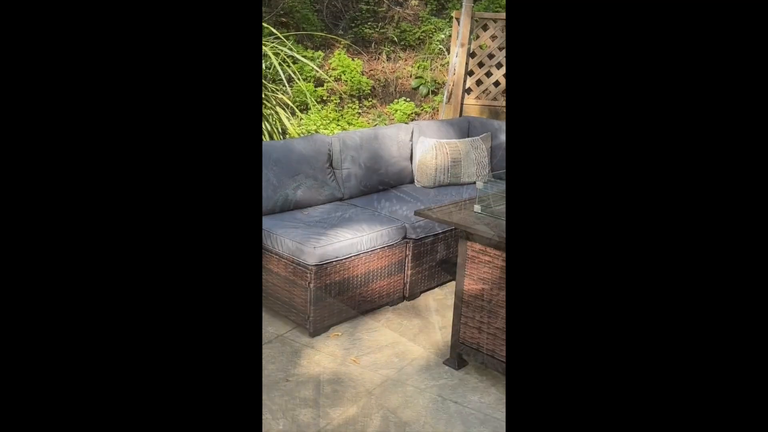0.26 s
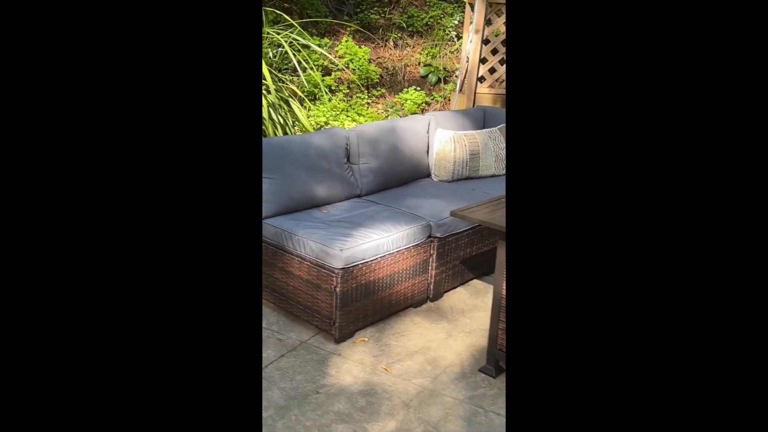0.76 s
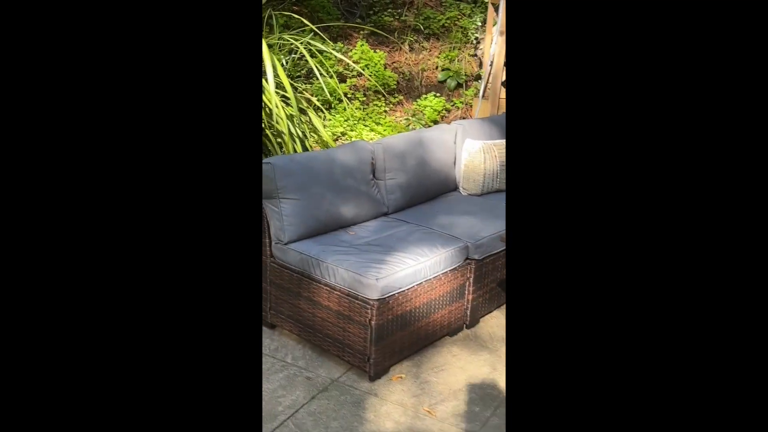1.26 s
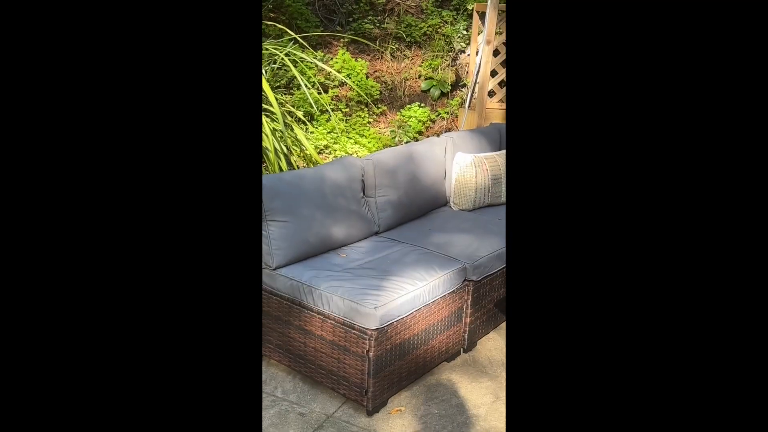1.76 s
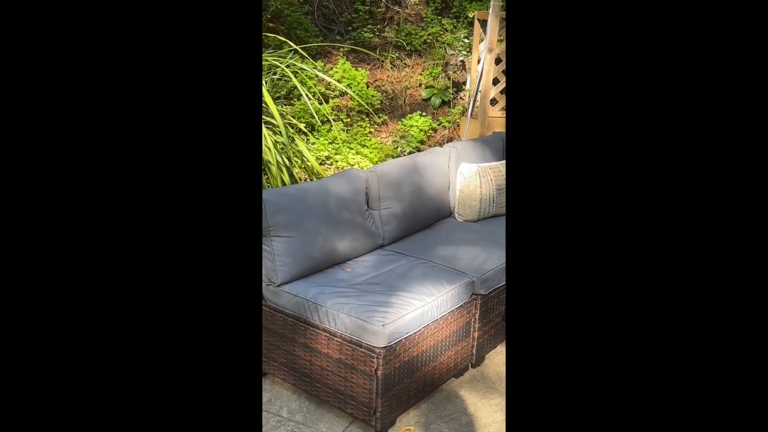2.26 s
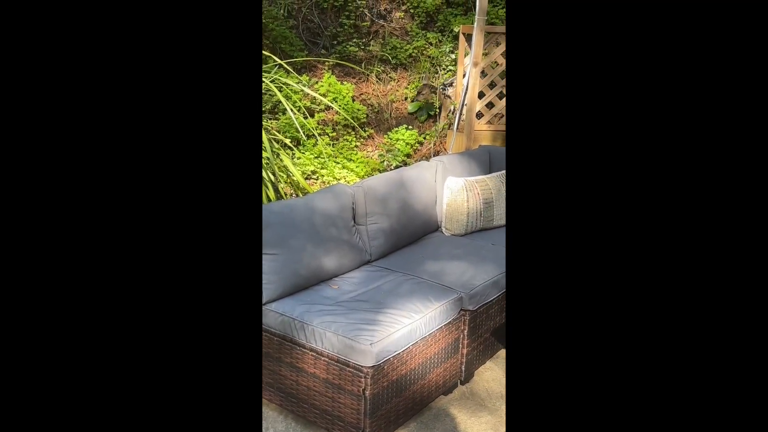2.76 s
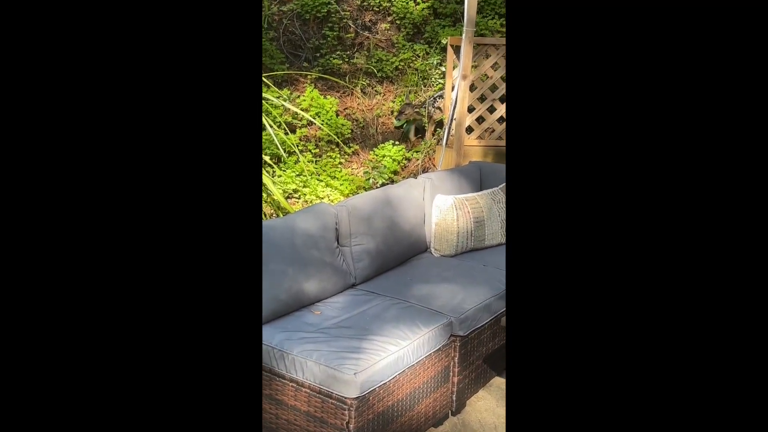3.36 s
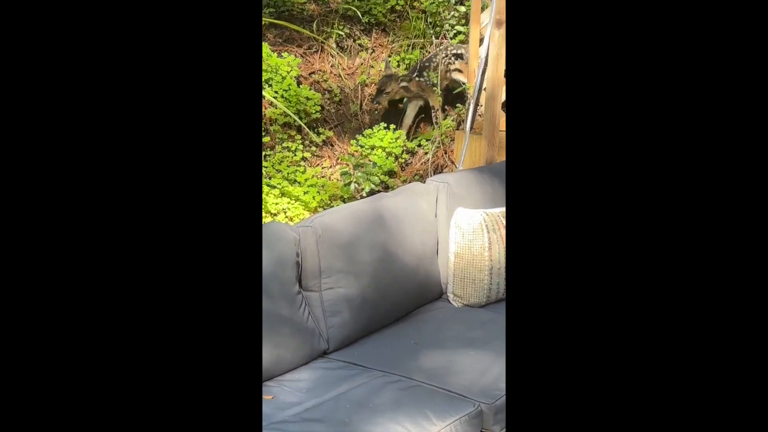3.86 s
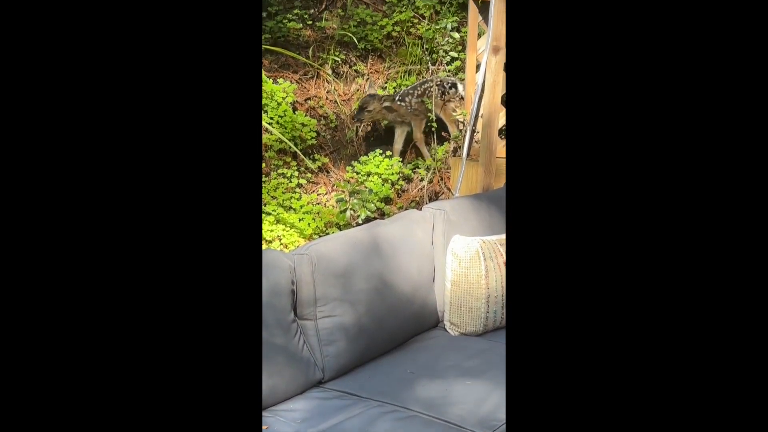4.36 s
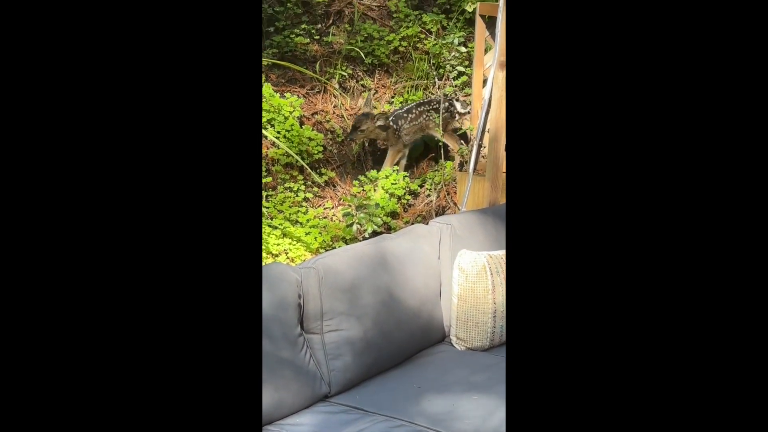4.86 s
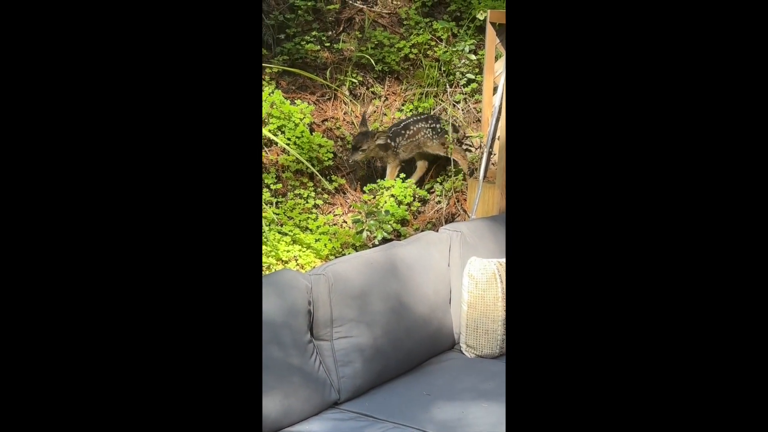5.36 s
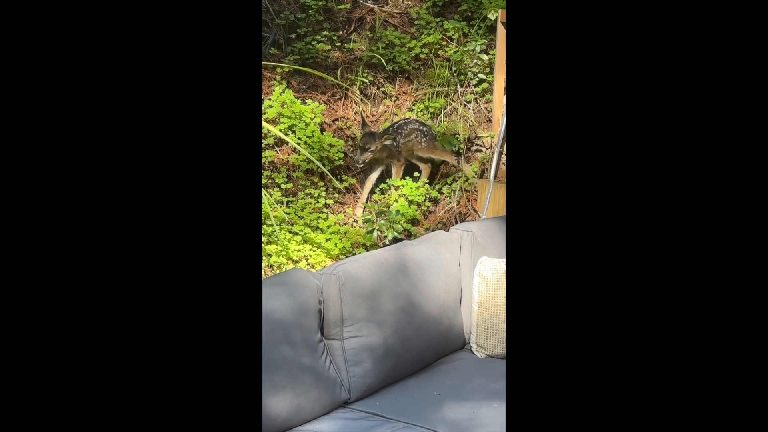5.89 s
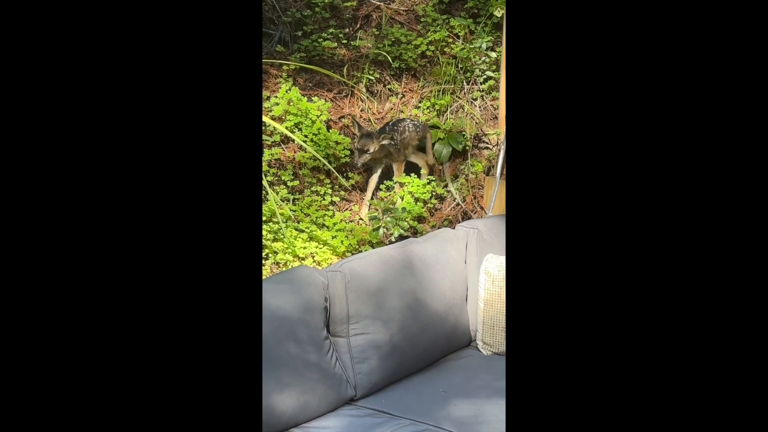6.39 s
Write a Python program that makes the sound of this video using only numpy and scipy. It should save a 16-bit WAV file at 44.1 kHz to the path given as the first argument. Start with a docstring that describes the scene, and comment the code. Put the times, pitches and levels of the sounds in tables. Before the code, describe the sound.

A fawn gives six short, high nasal bleats in a garden, with twig snaps, rustling leaves, soft thuds and a late birdsong phrase.

```python
"""A fawn bleats six times from a garden slope: vocal-fold harmonics shaped by nose, throat and mouth.
Most bleats arch in pitch (the third mainly sinks), turn hoarse as they fall and end in a nasal hum.
A songbird whistles its phrase twice in gliding pure tones, and far birds add thin notes.
Twigs snap as short noise bursts, soft steps thud, and leaves rustle as hiss with tiny ticks.
Under it lies a low outdoor rumble of noise; all is heard on a patio through two microphone ports."""
import sys
import numpy as np
from scipy import signal
from scipy.fft import rfft, irfft, next_fast_len
from scipy.io import wavfile
from scipy.ndimage import uniform_filter1d

SR = 44100
rng = np.random.default_rng(int(sys.argv[2]) if len(sys.argv) > 2 else 0)


def file_out(sig):
    """Save sig as 16-bit WAV at sys.argv[1]."""
    # one column per channel
    cols = np.atleast_2d(sig).T
    # limit, then scale
    lim = np.clip(cols, -1, 1)
    pcm = np.round(lim * 32767).astype(np.int16)
    wavfile.write(sys.argv[1], SR, pcm)


N = 292383  # length in samples
TIME = np.arange(N) / SR  # s


# The fawn's bleats: (start [s], length [s], crest after the start [s],
#   pitch at the start [Hz], at the crest [Hz], at the end [Hz], in the closing hum [Hz],
#   mouth opens after the start [s], opening time [s], closing time [s],
#   soft whine [dB], throat [dB], mouth [dB], bright [dB], hum [dB], final hoarseness [0-1])
BLEAT_CALLS = [(0.0, 0.3797, 0.1834, 872.3, 958.5, 786.2, 792, 0.1002, 0.0534, 0.0041, -75.5, -44, -38.5, -40.5, -46, 0.444),
               (1.219, 0.426, 0.2196, 780.1, 841.6, 629.4, 644.9, 0.096, 0.036, 0.02063, -79, -50.5, -43.5, -43.5, -53.5, 0.99),
               (3.085, 0.2319, 0.049, 635.9, 610.7, 433.6, 348, 0.00054, 0.0315, .024, -60.5, -58.5, -54, -44.5, -80, 0.028),
               (4.184, 0.30386, 0.1159, 800.2, 914.9, 752.9, 803.8, 0.0433, 0.01352, 0.00212, -56.5, -38.5, -35.5, -36.5, -40, 0.304),
               (5.505, .368, .166, 826.1, 920, 737.7, 770.8, 0.0744, 0.0118, 0.0042, -61, -46.5, -36, -38, -41.5, 0.268),
               (6.572, 0.29, 0.132, 836, 945, 735, 770, 0.03996, 0.00826, 0.0035, -60, -44, -38.5, -36, -41.5, .2)]


def fawn():
    """The fawn's voice: each call is sung by its own vocal folds and mouth movement."""
    out = np.zeros(N)
    for row in BLEAT_CALLS:
        add(out, *bleat(row))
    return out


# Shapes of the fawn's four groups of resonances: (frequency [Hz], level [dB])
NOSE_SHAPE = [(350, -32.5), (600, 8.5), (790, 7.5), (950, 1.5), (1300, -52.5), (2500, -68)]
THROAT_SHAPE = [(500, -74.5), (1000, -57), (1300, 2), (1750, 3), (2200, -9.5), (2750, -6.5), (3400, -22.5),
                (6000, -63.5)]
MOUTH_SHAPE = [(1500, -74), (2750, -39.5), (3200, -6.5), (3440, -14.5), (3560, -3.5), (3700, 1),
               (3850, -2.5), (4100, -12), (4650, -15.5), (5400, -41), (9000, -64.5)]
BRIGHT_SHAPE = [(2500, -63), (4200, -28.5), (4900, -20), (5600, -1.5), (6500, -0.5), (7400, -1.5),
                (8400, 4.5), (9400, 8.5), (10200, 7.5), (11200, -0.5), (12500, -15), (16000, -6.5)]
# The voice cracks upward: (middle [s], half length [s], pitch jump [share of the pitch],
#   strong-weak alternation of cycles [0-1], hoarseness [0-1])
VOICE_CRACKS = [(1.345, .051, .112, 0.42, 0.17), (3.141, 0.025, 0.16, 0, 0.06)]
# a soft closed-mouth whine sinks into each bleat that has time before it
LEAD_HZ, LEAD_SINK_HZ_PER_S, WHINE_FADE_S = 899.27, 2250, 0.042
HUM_DELAY_S, HUM_S = 0.012, 0.0074  # the closing hum; a slowly closing mouth delays and lengthens it
RASP_LEAD_S, RASP_S = 0.0234, .022  # the voice turns hoarse just before the hum
# below this pitch, and at the edges of a crack, the folds lose their grip
TAUT_HZ, SLACK_HOARSE, CRACK_HOARSE = 927, 0.74, 0.536


def bleat(row, shimmer=0.03, nose_db=-13, hum_throat_db=-5, sink_power=0.29, throat_sink=0.53,
          upper_power=1.114, linger=4.8):
    """Harmonics of the vocal folds pass through nose, throat and mouth as the mouth opens and shuts."""
    start, length, crest, start_hz, top_hz, end_hz, hum_hz, opens, opening, closing = row[:10]
    whine_db, throat_db, mouth_db, bright_db, hum_db, final_hoarse = row[10:]
    end = start + length
    lead_s = max(LEAD_HZ - start_hz, 0) / LEAD_SINK_HZ_PER_S
    t = np.arange(max(start - lead_s, 0), end + 2 * HUM_DELAY_S + linger * closing, 1 / SR)
    hum_at = end + HUM_DELAY_S + 2 * closing

    pitch = pitch_arch(t - start, length, crest, start_hz, top_hz, end_hz, hum_hz, closing)
    slack = np.maximum(1 - pitch / TAUT_HZ, 0)
    rasp = final_hoarse * bump(t, hum_at - RASP_LEAD_S, RASP_S + 2 * closing)
    hoarse = SLACK_HOARSE * slack + rasp
    doubling = np.zeros(len(t))
    for s, half, jump, alternation, rough in VOICE_CRACKS:
        crack = np.exp(-((t - s) / half) ** 6)
        pitch = pitch * (1 + jump * crack)
        # the sine peaks on the two edges of the crack
        hoarse = hoarse + rough * crack + CRACK_HOARSE * alternation * np.sin(np.pi * crack)
        doubling = doubling + alternation * crack
    pitch = uniform_filter1d(pitch, size=500)  # the larynx moves in rounded arcs

    # alternately strong and weak cycles put lines halfway between the harmonics
    k = np.arange(2, 57)[:, None] / 2
    line_gain = np.where(k % 1 == 0, 1, np.minimum(doubling, 1))
    lines = folds(k, pitch, np.clip(hoarse, 0, 1)) * line_gain

    opened = step(t, start + opens, opening)
    not_shut = 1 - step(t, end, closing)
    whine_fade_in = np.minimum((t - t[0]) / WHINE_FADE_S, 1)
    whine = gain_of(whine_db) * whine_fade_in * (1 - step(t, hum_at, 2 * closing))
    hum = gain_of(hum_db) * bump(t, hum_at, HUM_S + closing)
    open_throat = gain_of(throat_db) * opened * (1 - step(t, end + HUM_DELAY_S, closing))
    throat = whine + open_throat + gain_of(hum_throat_db) * hum
    nose = gain_of(nose_db) * throat + hum
    upper = opened ** upper_power * not_shut

    # throat and bright resonances sink with the larynx, the bright ones most
    sink = (pitch / TAUT_HZ) ** sink_power
    groups = [(NOSE_SHAPE, nose, 1),
              (THROAT_SHAPE, throat, sink ** throat_sink),
              (MOUTH_SHAPE, gain_of(mouth_db) * upper, 1),
              (BRIGHT_SHAPE, gain_of(bright_db) * upper, sink)]
    voice = np.zeros(len(t))
    for shape, gain, shift in groups:
        top_db = max(db for hz, db in shape)
        resonance = gain_of(read(shape, k * pitch / shift) - top_db)
        voice += gain * (resonance * lines).sum(0)
    shimmering = 1 + shimmer * wander(len(t), rate_hz=30)
    return t[0], voice * shimmering * signal.windows.tukey(len(t), .03)


RISE_POWER, FALL_POWER = 1.91, 2.84  # the pitch arch is flat on top and falls more steeply than it rises


def pitch_arch(t, length, crest, start_hz, top_hz, end_hz, hum_hz, closing):
    """Pitch sinks into the call, curves through its crest and settles on the closing hum."""
    rise = (top_hz - start_hz) * np.clip(1 - t / crest, 0, 1) ** RISE_POWER
    fall = (top_hz - end_hz) * np.clip((t - crest) / (length - crest), 0, 1) ** FALL_POWER
    lead = LEAD_SINK_HZ_PER_S * np.maximum(-t, 0)
    settle = (hum_hz - end_hz) * (1 - np.exp(-np.maximum(t - length, 0) / (2 * closing)))
    return top_hz - rise - fall + lead + settle


def folds(k, pitch, hoarse, jitter=0.00128, hoarse_jitter=0.032, rasp=0.537, ripple_db=3.2, waver=0.004514):
    """Lines at the multiples k of the pitch; upper ones swell and fade most, hoarseness frays all to noise."""
    size = len(pitch)
    slow_drift = waver * wander(size, rate_hz=16.9)
    fast_drift = (jitter + hoarse_jitter * hoarse) * wander(size, rate_hz=130)
    turns = np.cumsum(pitch * (1 + slow_drift + fast_drift)) / SR
    ripple = np.array([wander(size, rate_hz=34.5) for _ in k]) * np.minimum(k * pitch / 6000, 1)
    fray = np.array([wander(size, rate_hz=144) for _ in k])
    tones = np.sqrt(2) * np.cos(2 * np.pi * (k * turns + rng.random(k.shape)))
    lines = tones * gain_of(ripple_db * ripple)
    return lines * (np.sqrt(1 - hoarse ** 2) + rasp * hoarse * fray)


# The songbird's phrase, a rise, a long fall and a flick: (time after its start [s], length [s],
#   from [Hz], to [Hz], glide [s], level [dB], attack [s], fade [dB per s])
PHRASE_NOTES = [(0, 0.061, 3043, 6146, .068, 1, 0.0254, 305.5),
                (.074, 0.1353, 6288, 2483, .03, -6.5, 0.0134, 49.5),
                (0.227, .02, 2620, 2330, .016, -8, .008, 101.5)]
# When the phrase is sung: (time [s], level [dB])
PHRASE_TIMES = [(6.084, -44), (6.388, -37.5)]
# Thin notes of far birds: (time [s], length [s], from [Hz], to [Hz], glide [s], level [dB],
#   attack [s], fade [dB per s])
FAR_BIRD_NOTES = [(0.778, .11, 6800, 7480, .04, -75, 0.026, 61.5),
                  (0.854, 0.086, 5188, 5480, 0.0475, -76, 0.043, 41.5),
                  (2.409, 0.24, 5710, 6310, 0.0687, -62, 0.0644, 60),
                  (3.831, 0.015, 7600, 7100, 0.0083, -61.5, 0.0087, 264)]


def birds():
    """One songbird whistles its phrase twice; other birds whistle thinly from far off."""
    out = np.zeros(N)
    for s, db in PHRASE_TIMES:
        for delay, *note in PHRASE_NOTES:
            add(out, s + delay, gain_of(db) * whistle(*note))
    for s, *note in FAR_BIRD_NOTES:
        add(out, s, whistle(*note))
    return out


GLIDE_POWER = 1.5  # a bird's glide starts slowly, speeds up and settles


def whistle(length, from_hz, to_hz, glide, db, attack, fade_db_per_s):
    """A pure tone glides from one pitch to another, swelling and then fading."""
    t = np.arange(0, length, 1 / SR)
    hz = to_hz + (from_hz - to_hz) * np.exp(-(t / glide) ** GLIDE_POWER)
    level = gain_of(db - fade_db_per_s * t) * np.minimum(t / attack, 1) ** 2
    tone = np.sqrt(2) * np.sin(2 * np.pi * np.cumsum(hz) / SR)
    return level * tone * signal.windows.tukey(len(t), .1)


# Twigs and dry leaves cracking: (time [s], peak level [dB], centre [Hz], time to fade by 60 dB [s])
TWIG_SNAPS = [(.948, -54, 2220, 0.0223), (1.106, -51, 1970, 0.015), (1.151, -52, 5000, 0.0103),
              (1.895, -50.5, 3130, 0.0454), (2.372, -49, 3330, 0.154), (2.522, -42, 1700, 0.035),
              (2.841, -53.5, 2180, 0.025), (3.204, -41, 1474, 0.15), (3.712, -40, 2960, 0.0465),
              (3.94, -45, 3030, 0.028), (4.802, -36.5, 2480, 0.045), (4.833, -36, 2900, 0.0096),
              (4.857, -25, 4100, 0.0202), (5.284, -52, 2600, 0.0047)]
# Shared colour of the cracks: (frequency [Hz], level [dB])
CRACKLE_COLOUR = [(150, -41), (600, 7), (1500, 4), (4200, 0.5), (6300, -6.5), (9300, 2.5), (11500, -15.5),
                  (16000, -16.5)]


def snaps(sharpness=1.495, rise=0.00087):
    """Each crack is a fast-dying noise burst, strongest around the twig's own pitch."""
    out, t = np.zeros(N), np.arange(SR // 5) / SR
    for s, db, centre_hz, t60 in TWIG_SNAPS:
        def twig(hz):
            return 1 / (1 + 1j * sharpness * (hz / centre_hz - centre_hz / (hz + 1)))

        burst = filtered(coloured(rng.standard_normal(len(t)), CRACKLE_COLOUR), twig)
        burst = burst * gain_of(-60 * t / t60) * (1 - np.exp(-t / rise))
        add(out, s, gain_of(db) * burst / abs(burst).max())
    return out


# Soft steps and bumps on the patio: (time [s], level before the fade [dB], pitch [Hz],
#   time to fade by 60 dB [s], scuff [relative to the thud])
SOFT_STEPS = [(0.254, -37.5, 281.4, 0.118, 0.134), (1.11, -38, 171.8, 0.0543, 0.6),
              (2.527, -44, 222.5, 0.173, 1), (3.245, -41, 159, 0.156, 1)]


def steps(rise=0.00437):
    """A damped low thud with dull scuffing: the same pitch, roughened by a random level."""
    out, t = np.zeros(N), np.arange(SR // 4) / SR
    for s, db, hz, t60, scuff in SOFT_STEPS:
        scuffing = scuff * np.cos(2 * np.pi * hz * t) * wander(len(t), rate_hz=440)
        thud = np.sin(2 * np.pi * hz * t) + scuffing
        envelope = gain_of(db - 60 * t / t60) * (1 - np.exp(-t / rise))
        add(out, s, envelope * evened(thud) / np.sqrt(2))
    return out


# Gusts of rustling foliage: (middle [s], half length [s], level [dB])
LEAF_GUSTS = [(0.447, 0.125, -66), (1.09, 0.16, -71), (1.814, 0.15, -69.5), (2.397, .09, -67.5),
              (2.599, 0.0472, -58.5), (2.735, 0.084, -63), (2.958, 0.089, -61.5), (3.49, 0.349, -63),
              (3.983, 0.118, -70), (4.642, 0.07, -67), (4.841, 0.0485, -54), (4.973, 0.161, -63.5),
              (5.386, 0.135, -65.5), (5.98, 0.169, -73)]
# Colour of the leaves: (frequency [Hz], relative level per Hz [dB])
LEAF_COLOUR = [(200, 6.5), (500, 5.5), (1500, 2), (3300, 2.5), (6000, 0), (9500, 5), (12000, -10),
               (16000, -2)]
HUSH_DB = -77.5  # the leaves between gusts


def rustle(ticks_per_s=260, tick_size=0.35, size_db=3.5, flutter_db=1.99):
    """Leaves brush in uneven clumps: a soft hiss with tiny ticks in it."""
    struck = rng.random((2, N)) < ticks_per_s / SR
    ticks = struck * gain_of(size_db * np.minimum(rng.exponential(1, (2, N)), 4))
    tick_pulses = uniform_filter1d(ticks, size=24) * 24  # each tick lasts 24 samples
    grains = rng.standard_normal((2, N)) * (1 + tick_size * tick_pulses)
    level = gain_of(HUSH_DB) + sum(gain_of(db) * bump(TIME, s, half) for s, half, db in LEAF_GUSTS)
    flutter = gain_of(flutter_db * wander(N, rate_hz=55))
    return spread(*coloured(grains, LEAF_COLOUR)) * level * flutter


# Colour of the outdoor rumble: (frequency [Hz], relative level per Hz [dB])
RUMBLE_COLOUR = [(20, -30.5), (35, -9.5), (55, 1.5), (100, -2), (170, -11.5), (260, -18), (400, -26),
                 (1000, -30), (3000, -39.5), (12000, -55)]
AIR_DB = -57.5


def air(swell_db=0.9041):
    """Low outdoor rumble: mostly deep noise, slowly swelling."""
    rumble = spread(*coloured(rng.standard_normal((2, N)), RUMBLE_COLOUR))
    return rumble * gain_of(AIR_DB + swell_db * wander(N, rate_hz=0.96))


# How long the garden's faint tail lasts: (frequency [Hz], time to fade by 60 dB [s])
GARDEN_FADE = [(200, .3), (1500, 0.51), (4000, 0.663), (9000, 0.671), (16000, 0.087)]


def garden(x, near_db, far_db, near_t60=.09):
    """Ground, fence and furniture scatter the sound back at once; trees and house add a faint tail."""
    size = SR * 3 // 4
    t = np.arange(size) / SR
    # sparse random echoes, 2500 per second after the first 2 ms
    taps = rng.choice([-1., 1.], (2, size)) * (rng.random((2, size)) < 2500 / SR) * (t > .002)
    near = taps * gain_of(-60 * t / near_t60)
    # each frequency of the tail fades at its own rate
    hz, frame_s, z = signal.stft(taps, SR, nperseg=256)
    fade = gain_of(-60 * frame_s / read(GARDEN_FADE, hz)[:, None])
    tail = signal.istft(z * fade, SR, nperseg=256)[1][:, :size]
    tail = tail * np.minimum(t / 0.0045, 1)
    echoes = gain_of(near_db) * evened(near) + gain_of(far_db) * evened(tail)
    response = spread(*echoes) / np.sqrt(size)
    return x + signal.fftconvolve(x[None], response, axes=1)[:, :N]


# How alike left and right are in diffuse sound: (frequency [Hz], likeness [0-1])
LEFT_RIGHT_LIKENESS = [(100, 1), (290, .85), (640, .55), (1400, .85), (2400, .99), (16000, .95)]


def spread(a, b):
    """Two unrelated sounds become a diffuse left-right pair: a shared part and an opposed part."""
    def likeness(hz):
        return np.clip(read(LEFT_RIGHT_LIKENESS, hz), 0, 1)

    common = filtered(a, lambda hz: np.sqrt((1 + likeness(hz)) / 2))
    apart = filtered(b, lambda hz: np.sqrt((1 - likeness(hz)) / 2))
    return np.array([common + apart, common - apart])


def gain_of(db):
    """Decibels to amplitude."""
    return 10 ** (np.asarray(db) / 20)


def evened(x):
    """Scales to rms 1."""
    return x / np.sqrt(np.mean(x ** 2) + 1e-20)


def read(points, hz):
    """Reads a spectrum on a log-frequency axis."""
    f, value = np.transpose(points)
    return np.interp(np.log(hz + 1), np.log(f + 1), value)


def add(mix, s, sound):
    """Mixes a sound in at time s."""
    part = mix[max(round(s * SR), 0):][:len(sound)]
    part += sound[:len(part)]


def filtered(x, response):
    """Applies a response given as a function of frequency."""
    size = x.shape[-1]
    padded = next_fast_len(size + 2048, True)
    spectrum = rfft(x, padded) * response(np.fft.rfftfreq(padded, 1 / SR))
    return irfft(spectrum, padded)[..., :size]


def coloured(x, spectrum):
    """Shapes a sound by the spectrum and scales it to rms 1."""
    return evened(filtered(x, lambda hz: gain_of(read(spectrum, hz))))


def wander(size, rate_hz):
    """Smooth random motion of rms 1."""
    return evened(filtered(rng.standard_normal(size), lambda hz: 1 / (1 + (hz / rate_hz) ** 2)))


def bump(t, s, length):
    """A smooth rise and fall around the time s."""
    return np.exp(-((t - s) / length) ** 2)


def step(t, s, time):
    """A smooth step from 0 to 1 around s."""
    return .5 + .5 * np.tanh((t - s) / (2 * time))


def scene():
    """The fawn, birds, snaps and steps echo in the garden; leaves and air surround them."""
    deer = garden(fawn(), near_db=-13.5, far_db=-22.5, near_t60=0.1223)
    song = garden(birds(), near_db=-3.5, far_db=-8.5, near_t60=0.068)
    ground = garden(snaps() + steps(), near_db=-7.5, far_db=-44, near_t60=0.103)
    return deer + song + ground + rustle() + air()


# Phase lead of the left port over the right: (frequency [Hz], phase [radians])
PORT_PHASE = [(300, 0), (900, -.5), (1250, 0), (4200, 0), (4800, -.6), (5300, 0), (6400, 0), (7200, -.65),
              (12200, -3.1), (16000, -4.2)]
# Left port over right: (frequency [Hz], level [dB])
PORT_BALANCE = [(400, 0), (750, -3), (1100, -3), (1500, 0)]
EDGE_HZ = 15900  # upper band limit


def record(dry):
    """The two ports differ in colour and drift out of phase in the treble; then the band limit."""
    half = np.array([[.5], [-.5]])  # each port takes half of the difference

    def ports(hz):
        return np.exp(1j * half * read(PORT_PHASE, hz)) * gain_of(half * read(PORT_BALANCE, hz))

    low_pass = signal.firwin(511, EDGE_HZ, window=("kaiser", 9), fs=SR)
    return signal.oaconvolve(filtered(dry, ports), low_pass[None], "same")


dry = scene()
out = record(dry)
file_out(out)
```